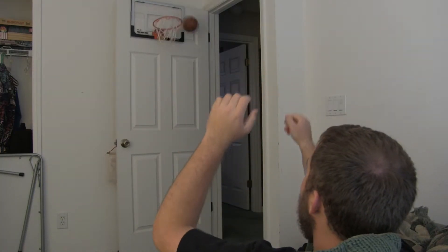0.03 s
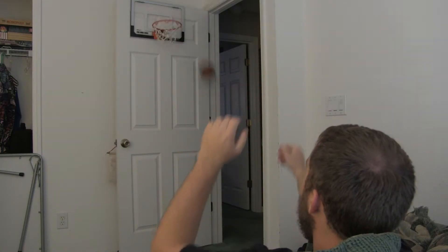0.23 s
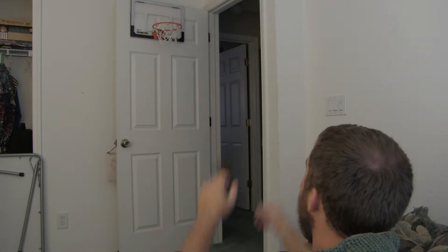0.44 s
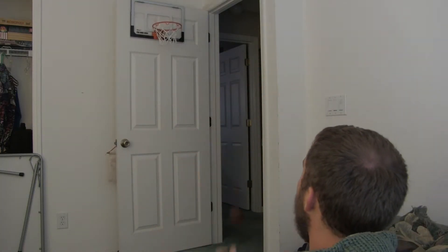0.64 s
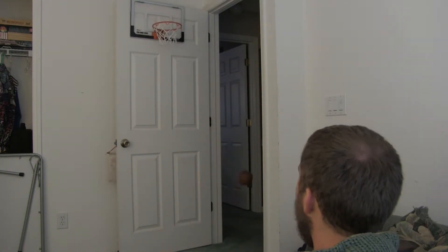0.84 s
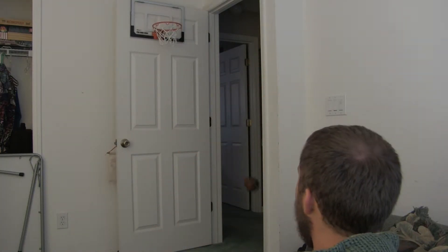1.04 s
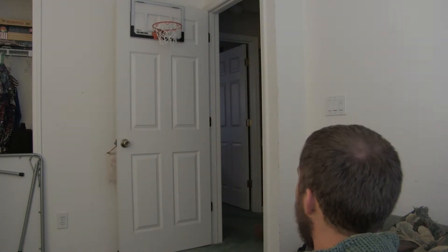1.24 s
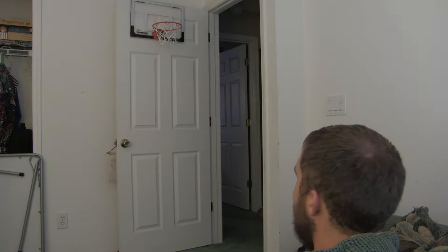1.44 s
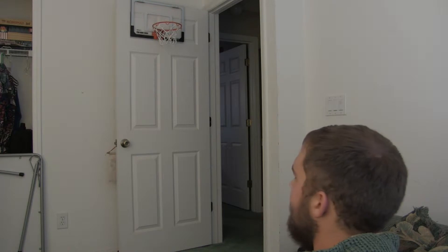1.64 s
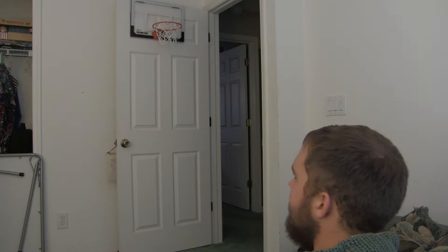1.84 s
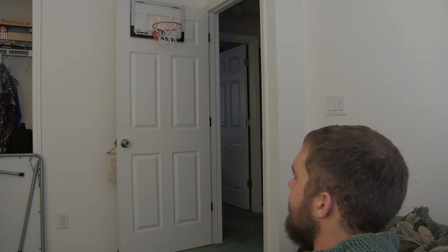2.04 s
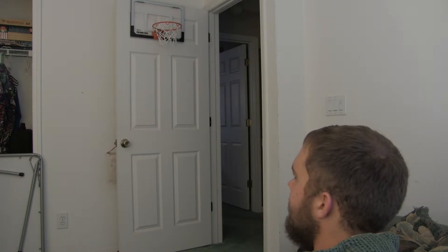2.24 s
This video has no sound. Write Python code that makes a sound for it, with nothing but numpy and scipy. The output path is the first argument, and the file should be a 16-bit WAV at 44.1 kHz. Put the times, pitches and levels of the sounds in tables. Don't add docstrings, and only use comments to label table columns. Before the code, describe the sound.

A small ball smacks a plastic backboard hung on a hollow door; the board buzzes, the door knocks and the loose rim ticks and squeaks, then the ball bounces on the floor, close stereo in a quiet bedroom.

```python
import sys
import numpy as np
from scipy import signal
from scipy.fft import rfft, irfft
from scipy.io import wavfile

SR = 44100
rng = np.random.default_rng(int(sys.argv[2]) if len(sys.argv) > 2 else 0)


def master_out(mix):
    frames = np.transpose(np.atleast_2d(mix))
    ceiling = np.clip(frames, -1, 1)
    pcm = np.round(ceiling * 32767).astype(np.int16)
    wavfile.write(sys.argv[1], SR, pcm)


def how_loud(loudness_db):
    steps = np.asarray(loudness_db, float) / 20
    return 10 ** steps


N = 100239
T = np.arange(N) / SR


def unit(x):
    return x / np.sqrt(np.mean(x ** 2))


def noise():
    return rng.standard_normal(N)


def colour(x, points):
    f = np.maximum(np.arange(N // 2 + 1) * SR / N, 1)
    hz, db = np.array(points).T
    return irfft(rfft(x) * how_loud(np.interp(np.log(f), np.log(hz), db)), N)


def band(x, hz, width):
    return signal.lfilter(*signal.iirpeak(min(hz, .45 * SR), hz / width, SR), x)


def steep_band(x, hz, width):
    return band(band(x, hz, width), hz, width)


def ring(x, hz, t60):
    pole = np.exp(2j * np.pi * hz / SR - np.log(1000) / (t60 * SR))
    return signal.lfilter([1], [1, -pole], x).imag


def loose(x, hz, t60, wobble_db=2.5):
    return how_loud(wobble_db * walk(40)) * ring(x, hz, t60)


def push(start, ms):
    u = np.maximum(T - start, 0) / (ms / 5000)
    return u ** 2 * np.exp(-u) / (2 * SR * ms / 5000)


def focus(modes, hz, narrow_db):
    octaves = np.log2(np.array(modes)[:, :1] / hz)
    return how_loud(-narrow_db * octaves ** 2)


def fall(start, t60, attack=.001):
    return np.clip((T - start) / attack, 0, 1) * how_loud(-60 * np.maximum(T - start, 0) / t60)


def walk(rate):
    return unit(signal.sosfilt(signal.butter(2, rate, fs=SR, output="sos"), noise()))


# (frequency [Hz], level [dB])
WIDTH = [(30, -14), (60, -22), (125, -17), (250, -15), (500, -7.5), (1000, -4), (4000, -2), (8000, -6.5),
         (13000, -12)]


def diffuse(points):
    mid, side = colour(rng.standard_normal((2, N)), points)
    return mid + colour(side, WIDTH) * np.array([[1], [-1]])


# (time [s], level [dB], brightness [dB per octave])
BUZZ = [
    (0, -6, 3.5),
    (0.027, -19, -3),
    (0.059, -20, 1.5),
    (0.116, -21, -1.5),
    (0.23, -29, -3.5),
    (0.329, -39, -1.5),
    (0.438, -42, -1.5),
    (0.539, -55.5, -8.5),
    (0.658, -70, -19),
]
# (frequency [Hz], width [Hz], level [dB])
BOARD_MODES = [(560, 97.5, 2), (702, 280, 2), (838, 27, -5.5), (968, 42, 1), (1243, 82, -2),
               (1451, 167, -2.5), (1757, 590, -1.5), (2083, 350, -7), (3934, 390, -9), (5205, 1940, -7.5),
               (8200, 910, -14), (10370, 4300, -14.5), (2940, 10000, -30), (230, 260, -1.5)]


def board():
    clicks_per_s, scatter_db = 3000, 2.5
    s, db, tilt = np.array(BUZZ).T
    total = 0
    for hz, width, gain_db in BOARD_MODES:
        clicks = (rng.random(N) < clicks_per_s / SR) * noise()
        clicks = clicks * how_loud(scatter_db * rng.exponential(size=N))
        level = np.interp(T, s, db + tilt * np.log2(hz / 1000), right=-120)
        total = total + how_loud(gain_db + level) * unit(band(clicks, hz, width))
    return how_loud(-9) * total


# (frequency [Hz], level [dB])
AIR_SPECTRUM = [(82, -32), (140, -2), (248, -9), (367, -5), (398, -6), (567, -5), (1460, -15), (2040, -13),
                (15500, -28)]
# (frequency [Hz], level [dB rms])
HUM = [
    (59.5, -84.5),
    (120, -59),
]


def air():
    hum = sum(how_loud(db + 0.38 * walk(3.6)) * np.sin(2 * np.pi * hz * T) for hz, db in HUM)
    hum_band = how_loud(-70) * unit(steep_band(noise(), 59.2, 67))
    tone = how_loud(-58.2 + .4 * walk(4)) * unit(diffuse(AIR_SPECTRUM))
    return tone + hum + hum_band


# (time [s], level [dB], contact [ms], pitch [Hz])
KNOCKS = [(.004, -35, 0.33, 930), (.039, -17.5, 0.58, 570), (0.053, -16, 1.3, 550), (.09, -17, 0.52, 570),
          (0.121, -42, 0.88, 620), (.14, -23.5, 0.21, 1080), (.1475, -14, 0.52, 870),
          (0.165, -11.5, 0.91, 260), (.174, -15.5, 1.47, 346), (.183, -14.5, 1.64, 410),
          (.19, -13.5, 0.65, 830), (.203, -17.5, 1.6, 220), (.219, -18.5, 0.78, 750),
          (0.236, -16, 0.89, 304), (.244, -20, 1.2, 470), (.256, -16, 1.16, 374), (.28, -14.5, 2.8, 247),
          (0.299, -22, 1.2, 260), (0.31, -21, 5.1, 203), (.329, -27, 2.3, 340), (.352, -31, 1.5, 302),
          (0.363, -30, 1, 296), (.384, -29, 1.35, 215), (0.397, -27.5, 1, 246), (.418, -27.5, 0.74, 570),
          (.427, -24.5, 0.75, 1080), (0.438, -38, 0.92, 1000), (.468, -35, 0.91, 496),
          (.493, -31, 2.2, 207), (0.512, -35.5, 2, 220)]
# (frequency [Hz], level [dB], t60 [s])
DOOR_MODES = [(120, -14.5, .15), (155.8, -3.5, 0.099), (181, 10.5, 0.081), (214.3, -2.5, 0.087),
              (235, -0.5, .06), (280.8, 1.5, 0.043), (369.8, 3, 0.072), (458.3, -0.5, 0.094),
              (620, 2, 0.05), (701, -1.5, 0.084), (776, 0, 0.078), (870, 5, 0.036), (1080, 1, 0.091),
              (1266, 2, .06)]


def door():
    blows = np.array([how_loud(db) * push(s, ms) for s, db, ms, _ in KNOCKS])
    force = focus(DOOR_MODES, np.array(KNOCKS)[:, 3], 25.5) @ blows
    panels = 0
    for k, (hz, db, t60) in enumerate(DOOR_MODES):
        sign = (-1) ** k
        panels = panels + sign * how_loud(db + 2.5) * loose(force[k], hz, min(t60, .065))
    sway = how_loud(-32.5) * ring(blows.sum(0), 62, .4)
    return panels, sway


# (time [s], level [dB], ring frequency [Hz], ring level [dB], chatter [s])
TICKS = [(.08, -35, 8200, -4, 0.024), (.108, -28, 5670, -18.5, 0.017), (0.154, -33, 8200, -3.5, 0.0088),
         (0.25, -24.5, 8580, -4.5, 0.0093), (0.259, -25.5, 5670, -3.5, 0.0082),
         (.252, -30, 2640, 0, 0.0094), (0.268, -32, 2030, 4.5, 0.012), (.28, -36.5, 3900, -2, 0.0062),
         (.348, -29.5, 1360, 5, 0.0054), (0.352, -35.5, 2080, 3.5, .006), (0.356, -35, 4400, -2.5, .006),
         (.357, -39, 2300, 9, 0.0028), (.364, -36.5, 1800, 9.5, 0.0047), (0.369, -36, 4400, -1.5, 0.0032),
         (0.378, -46.5, 9200, 7.5, 0.0024), (0.389, -43.5, 1610, 16.5, 0.0058),
         (.396, -41.5, 2670, 11, .008), (.404, -44, 6600, 1.5, .005), (0.415, -34.5, 5860, 4, 0.0051),
         (.422, -31.5, 2400, -4, 0.0066), (0.425, -37, 5800, 3.5, 0.0044),
         (0.439, -37.5, 5450, 3.5, 0.0031), (0.474, -38.5, 11900, -13, 0.0076),
         (0.931, -60, 12190, -6.5, 0.037)]


def rim():
    t60, split = .008, .05
    rings, clicks = 0, 0
    grit = unit(rng.laplace(size=N))
    for s, db, hz, ring_db, chatter in TICKS:
        x = how_loud(db) * fall(s, 4 * chatter, .002) * grit
        clicks = clicks + x
        pair = ring(x, hz * (1 + split), t60) + ring(x, hz * (1 - split / 3), 2 * t60)
        rings = rings + how_loud(ring_db - 16.5) * pair
    return steep_band(clicks, 4300, 9500) + rings


# (partial [number], level [dB])
SQUEAK = [
    (1, -47),
    (2, -56),
    (3, -77),
    (4, -66),
]


def squeak():
    start, attack, hold, t60 = .46, .016, .035, .26
    since = T - start
    hz = (3850 - 500 * since) * (1 + .02 * fall(start, 0.36) * walk(140))
    phase = 2 * np.pi * np.cumsum(hz) / SR
    envelope = np.minimum(np.clip(since / attack, 0, 1), how_loud(-60 * (since - hold) / t60))
    partials = 0
    for number, db in SQUEAK:
        partials = partials + how_loud(db + 3.5 * walk(70.7)) * np.sin(number * phase)
    return envelope * partials


# (time [s], level [dB], contact [ms], pitch [Hz], ball ring level [dB])
BOUNCES = [(.6635, -27, 3, 350, 4), (0.6657, -28, 1.24, 800, 4.5), (0.6737, -18.5, 1.34, 454, 4),
           (0.6763, -21.5, 1.59, 440, 3), (.6895, -19.5, 2.8, 300, -3), (.691, -28, 2.4, 780, -1),
           (0.701, -28, 2.3, 340, 3), (1.344, -39.5, 2.9, 293, 4), (1.349, -36, 1.1, 427, -3),
           (1.353, -43, 1.5, 456, -3), (1.359, -38, 1.5, 379, -14.5), (1.37, -32, 1.73, 210.7, -32),
           (1.387, -40, 1.56, 270, -3), (1.409, -40, 1.8, 230, -7), (1.429, -50, 2.6, 283, -12),
           (1.72, -50.5, 2.3, 250, -19.5), (1.742, -50.5, 1.5, 255, -18.5)]
# (frequency [Hz], level [dB], t60 [s])
FLOOR_MODES = [(105, -20, 0.1), (148.5, -10, 0.35), (182.3, -1.5, 0.099), (234, -1, 0.047),
               (287, -3.5, 0.051), (342.6, 4.5, 0.066), (448, -2, .045), (503.5, -5, 0.056),
               (557, 2, 0.049), (665, -30.5, 0.031), (860, -29, .06)]
# (frequency [Hz], level [dB], t60 [s])
BALL_MODES = [(354, -4.5, 0.097), (391, -7.5, 0.13), (440, -4, 0.049), (712, -8, 0.051), (730, -20.5, 0.36),
              (751.6, -15, 0.19), (776.3, -0.5, 0.065), (865, -5.5, 0.03), (933, -7.5, 0.046),
              (1230, 4, 0.026), (1333, -17.5, 0.047), (1392, -19, 0.017), (1800, -0.5, 0.029),
              (2220, 6, 0.019)]
# (time [s], level [dB])
SLAPS = [
    (0.665, -51),
    (.668, -41),
    (0.671, -39.5),
    (.689, -63),
    (1.352, -49.5),
    (1.743, -84),
]


def ball():
    narrow_db, skin_share = 8, 0.38
    hz = np.array(BOUNCES)[:, 3]
    blows = np.array([how_loud(db) * push(s, ms) for s, db, ms, _, _ in BOUNCES])
    skin_blows = np.array([how_loud(db + g) * push(s, skin_share * ms) for s, db, ms, _, g in BOUNCES])
    floor = focus(FLOOR_MODES, hz, narrow_db) @ blows
    skin = focus(BALL_MODES, hz, narrow_db / 2) @ skin_blows
    modes = 0
    for force, (f, db, t60) in zip([*floor, *skin], [*FLOOR_MODES, *BALL_MODES]):
        modes = modes + how_loud(db) * loose(force, f, t60, 3.5)
    slap = sum(how_loud(db) * fall(s, 0.0218) for s, db in SLAPS) * band(noise(), 5000, 12500)
    thud = sum(how_loud(db) * fall(s, 0.029) for s, db in SLAPS) * steep_band(noise(), 1718, 1200)
    return modes + slap + how_loud(17) * thud


def sleeve():
    start, length = .76, .24
    swing = np.sin(np.pi * np.clip((T - start) / length, 0, 1))
    return how_loud(-67.5 + 2.2 * walk(30)) * swing * unit(band(noise(), 5266, 11500))


def room(x):
    gap = 0.0052
    n = diffuse([(50, -26), (200, -4.5), (600, -4), (1500, -2), (5000, -4), (16000, -3)])
    low = signal.sosfilt(signal.butter(1, 1500, fs=SR, output="sos"), n)
    bass_tail = low * fall(gap, 0.25, 0.0097)
    treble_tail = (n - low) * fall(gap, 0.18, 0.0014)
    hall = how_loud(-35) * n * fall(0.06, 1.2, 0.024)
    h = bass_tail + treble_tail + hall
    h = h[:, :SR] / np.sqrt(np.sum(h ** 2) / 2)
    return how_loud(-1) * signal.fftconvolve(x[None], h, axes=1)[:, :N]


def scene():
    panels, sway = door()
    x = board() + panels + rim() + squeak() + ball() + sleeve()
    x = signal.sosfilt(signal.butter(3, 127, "high", fs=SR, output="sos"), x)
    direct = x * how_loud(np.array([[.2], [-.2]]))
    return direct + room(x) + sway + air()


def roll_off(x):
    return signal.sosfilt(signal.butter(12, 15800, fs=SR, output="sos"), x)


def record(dry):
    rounded = np.tanh(1.1 * dry) / 1.1
    x = signal.sosfilt(signal.ellip(8, .2, 70, 15700, fs=SR, output="sos"), rounded)
    return roll_off(x)


dry = scene()
out = record(dry)
master_out(out)
```